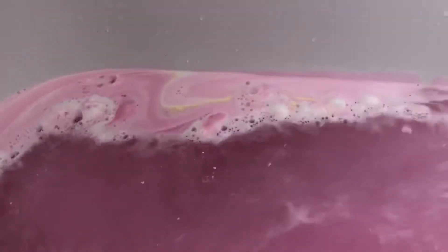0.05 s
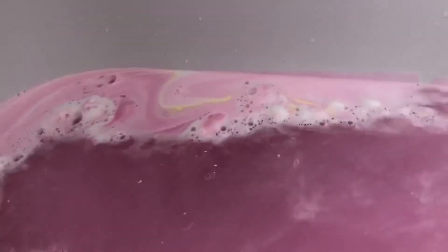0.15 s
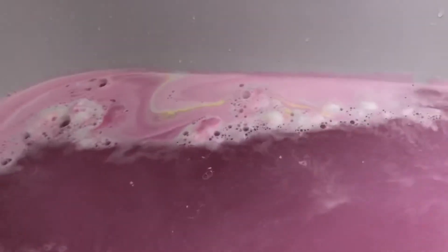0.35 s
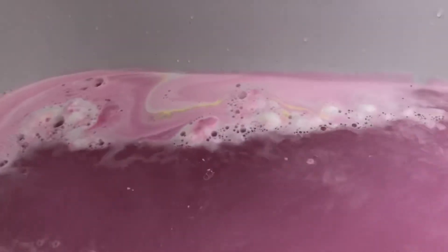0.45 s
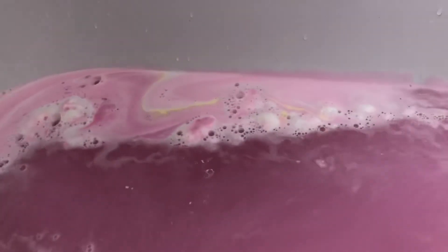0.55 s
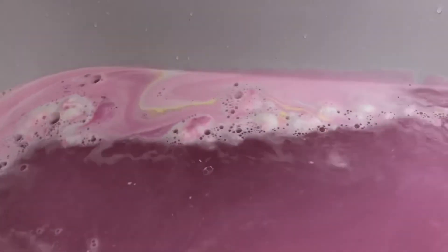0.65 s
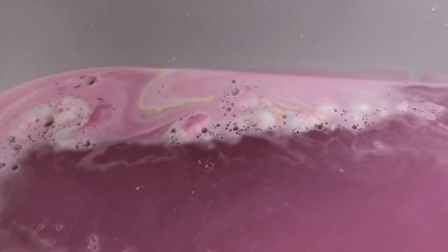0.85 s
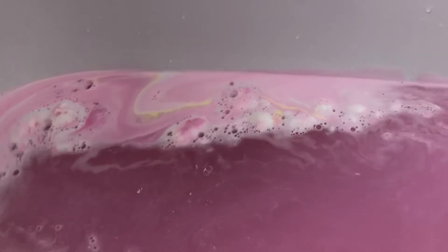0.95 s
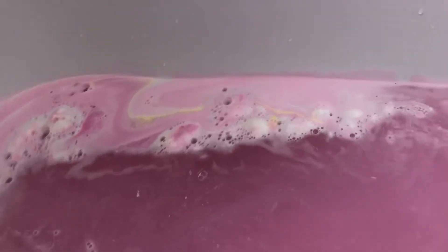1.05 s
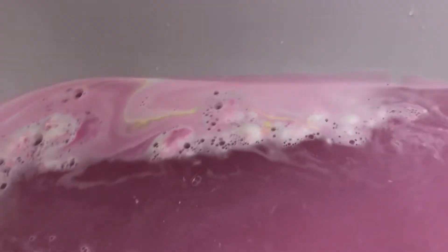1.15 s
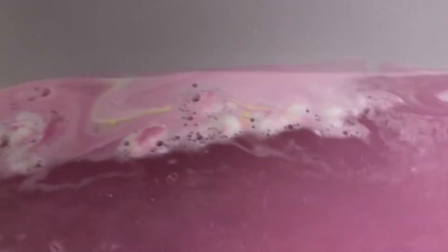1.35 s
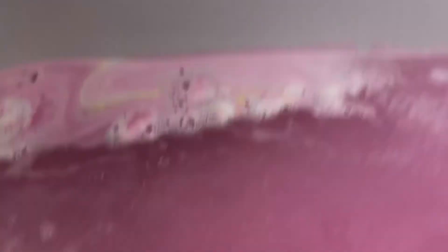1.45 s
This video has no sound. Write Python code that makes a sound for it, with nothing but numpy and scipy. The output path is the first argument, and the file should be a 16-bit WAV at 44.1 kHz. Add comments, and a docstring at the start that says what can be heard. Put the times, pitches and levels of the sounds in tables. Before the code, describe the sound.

Water sloshes gently in a bathtub, close to the microphone. Three brief plopping splashes come about half a second apart, with bubbles popping in between and soft low booms from the tub, over faint bathroom hum and hiss.

```python
"""Bath water laps in a tub: three small waves fold over with a splash and a plop, and drops and foam
tick between them. Each trapped bubble is a damped oscillator that rings briefly, rising in pitch.
The moving water makes the tub boom softly; the air in its hollow resonates and the hard-walled
bathroom reverberates. Low ventilation noise and a faint hiss lie underneath, and the gain dips
a little after each loud splash."""
import sys
import numpy as np
from scipy import signal
from scipy.fft import rfft, irfft
from scipy.io import wavfile
from scipy.ndimage import uniform_filter1d

SR = 44100
rng = np.random.default_rng(int(sys.argv[2]) if len(sys.argv) > 2 else 0)


def dump_mix(stems):
    """Bounce the given channels to the path in sys.argv[1] as a 16-bit WAV at rate SR."""
    frames = np.atleast_2d(stems).T  # one column per channel
    limited = np.clip(frames, -1, 1)  # hard clip at full scale
    pcm = np.round(limited * 32767).astype(np.int16)
    wavfile.write(sys.argv[1], SR, pcm)


N = 66150

# Trapped air bubbles (time [s], pitch [Hz], level [dB], decay time [s], rise [octaves per decay time])
TRAPPED_BUBBLES = [ (.0250, 4840, -39.5, 0.001, .02), (.1315, 1746, -48.5, 0.0064, 0.0063),
                   (.1690, 1210, -43.5, 0.0018, .03), (.1755, 2800, -40, 0.0016, 0.025),
                   (.1865, 1770, -43, 0.0038, 0.019), (.2065, 1163, -29, 0.0035, 0.1),
                   (.2238, 834, -31, 0.0041, 0.053), (.2330, 7800, -42, 0.0012, 0.05),
                   (.2402, 1460, -12, 0.00061, 0.01), (.2411, 874, -23, .0018, 0.017),
                   (.2415, 605.6, -22.5, 0.0099, 0.01), (.2412, 10600, -22.5, .0007, 0.03),
                   (.2525, 2400, -33, 0.0037, .01), (.3265, 11700, -41, 0.0015, 0.027),
                   (.3310, 3530, -45.5, 0.0018, .02), (.4225, 1973, -47.5, 0.0022, 0.029),
                   (.4370, 1300, -42, 0.0029, 0.046), (.4977, 4130, -34, 0.0011, 0.015),
                   (.4978, 2770, -38.5, 0.002, 0.013), (.4982, 1174, -39, 0.0079, 0.11),
                   (.5235, 1780, -45.5, 0.0033, 0.032), (.6725, 1670, -44.5, 0.0024, 0.028),
                   (.6962, 587, -28, 0.0037, 0.01138), (.6977, 4450, -23.5, 0.00059, 0.016),
                   (.7022, 933, -28, 0.0077, 0.031), (.7010, 1376, -30, 0.0039, 0.023),
                   (.7145, 1250, -32.5, 0.003, .03), (.7195, 2520, -34.5, 0.0032, 0.053),
                   (.8852, 3700, -38.5, 0.0011, 0.027), (.8856, 878, -38, 0.0045, 0.038),
                   (.8860, 1610, -47, 0.0014, .03), (.8850, 517, -50, 0.014, 0.0088),
                   (.9211, 1296, -42.5, 0.0037, .03), (.9217, 597, -43, 0.01, 0.024),
                   (.9860, 1136, -48, .008, 0.098), (.9868, 11000, -40.5, 0.00059, .02),
                   (1.0080, 1974, -35.5, 0.0064, 0.021), (1.0075, 1502, -37, 0.005, 0.023),
                   (1.0330, 8340, -39, 0.0012, 0.053), (1.0410, 3510, -31, 0.0016, 0.016),
                   (1.0562, 2970, -35, 0.0024, 0.016), (1.1125, 1830, -43.5, 0.0024, 0.017),
                   (1.1285, 8400, -40.5, .0015, 0.0313), (1.1555, 4230, -38.5, 0.0032, 0.048),
                   (1.1920, 1384, -20, 0.0024, 0.076), (1.1927, 1920, -28.5, 0.0014, .02),
                   (1.2015, 1295, -28, 0.0062, 0.0077), (1.2082, 2050, -29, 0.0042, 0.0061),
                   (1.2175, 1312, -37.5, 0.023, 0.0036)]
PINCH_CYCLES, PLOP_LOW_HZ = 0.36, 374
# Wet slaps and bursting films (time [s], level [dB], centre [Hz], width [octaves], decay time [s])
SLAPS = [ (0.0249, -44.5, 4600, 0.64, 0.0037), (0.1165, -31, 3600, 0.85, 0.0041),
         (.1300, -41.5, 4900, 1.4, 0.009), (0.168, -32, 4970, 3.4, 0.0026),
         (0.2055, -24, 4420, 1.4, 0.00063), (0.2228, -28.5, 2470, 0.91, 0.003),
         (0.2352, -30.5, 2800, 1.3, 0.0057), (0.2398, -16.5, 4100, 0.88, 0.0018),
         (0.299, -36.5, 6960, 0.83, 0.0027), (.4368, -48.5, 5660, 0.55, 0.0027),
         (0.4974, -30, 7460, 1.1, 0.00087), (0.5227, -42, 2830, 0.44, 0.0012),
         (0.6464, -49, 2260, 1.03, 0.011), (.6730, -42.5, 3000, .7, 0.0043),
         (0.6942, -35.5, 1510, 0.53, 0.011), (0.6973, -38, 13000, 1.2, 0.0013),
         (0.6983, -31, 4449, 0.25, 0.0035), (0.702, -41.5, 8600, 0.16, 0.0026),
         (0.7024, -32, 2040, 0.41, 0.0028), (.7080, -41, 530, 0.25, 0.021),
         (0.7243, -31.5, 3400, 1.01, 0.007), (0.8401, -41.5, 2530, 0.73, 0.0032),
         (0.87, -41, 4500, .8, 0.0013), (0.8855, -37, 3126, 0.22, 0.0022),
         (0.9435, -43, 4700, 0.52, 0.00089), (0.9848, -42.5, 2400, 1.2, 0.0022),
         (1.009, -42.5, 4100, .4, .003), (1.0411, -31, 4900, .6, 0.0021), (1.0515, -36, 5500, 1.2, 0.0026),
         (1.058, -39, 6500, 1.2, .002), (1.089, -46, 6500, 0.92, 0.0028),
         (1.1118, -37.5, 2930, 0.95, 0.0031), (1.121, -45, 5500, 0.35, 0.0045),
         (1.1546, -32.5, 5760, 1.9, 0.0016), (1.1918, -26, 2150, 0.82, 0.0016),
         (1.192, -40, 11000, 1.1, 0.0023), (1.1960, -40, 670, 0.72, 0.042),
         (1.2487, -41.5, 9600, 0.96, 0.0035), (1.3315, -44, 12500, 0.53, 0.0016),
         (1.433, -48.5, 6792, 0.44, 0.0018), (1.4915, -39, 3970, 0.87, 0.0014)]
SLAP_RISE_S = 0.00014
# Clouds of small bubbles (time [s], level [dB], decay time [s], centre [Hz], width [octaves])
BUBBLE_CLOUDS = [(.160, -43.5, 0.018, 2700, .5), (0.247, -48, 0.041, 7000, 0.71),
                 (0.714, -41.5, 0.026, 3350, 1.2), (.780, -60, .09, 1750, 0.6405),
                 (0.891, -61, 0.13, 1640, 1.6), (1.040, -55, 0.15, 5230, 0.67),
                 (1.198, -54.5, 0.016, 3400, 0.62)]
CLOUD_RISE_S, FIZZ_LOW_HZ, FIZZ_HIGH_HZ = 0.005, 799, 14830
FIZZ_PER_S, FIZZ_SPREAD_DB, FIZZ_DECAY_CYCLES = 2800, 3, 2.7
# Low booms of the moving water on the tub (time [s], pitch [Hz], level [dB], decay time [s])
TUB_BOOMS = [(0.059, 61.6, -55.5, 0.16), (.255, 123.3, -43, 0.038), (0.256, 233, -45.5, 0.045),
             (0.701, 127, -47, 0.029), (.700, 237, -52, 0.06625), (.950, 65, -55, 0.065),
             (1.059, 111, -47.5, 0.14), (1.192, 72, -38, 0.02), (1.194, 236, -48, 0.034),
             (1.196, 372.5, -43.5, 0.017), (1.445, 64.5, -41.5, 0.068)]
BOOM_RISE_S = 0.01
# Air modes of the tub (frequency [Hz], gain [dB], time to fall 60 dB [s])
TUB_MODES = [(471, 3, 0.24), (533, -10, 0.51), (602.67, -4.5, 0.45), (816, 7, 0.39), (1201, 0.5, 0.096),
             (1355, -10, 0.16), (1625, 4.5, 0.12), (2112.8, 8, 0.13), (2415, -1.5, 0.21)]
# Reflections from the tub walls (delay [s], gain [dB])
TUB_ECHOES = [(.0017, -16.5), (.0046, -19.5), (0.0107, -22.5), (0.0131, -18.5)]
# Reverberation time of the bathroom (frequency [Hz], time to fall 60 dB [s])
REVERB_TIMES = [(150, 0.15), (400, 0.53), (1040, 0.2831), (2760, 0.35), (7280, 0.17), (15000, 0.1)]
# Colour of the reverberation (frequency [Hz], gain [dB])
REVERB_COLOUR = [(150, 16), (500, -0.5), (1200, -0.5), (2500, -1.5), (5000, -4.5), (10000, -6.5),
                 (16000, 1)]
REVERB_DB, REVERB_BUILD_S = -2.5, 0.0071
# Spectrum of the ventilation rumble (frequency [Hz], relative density [dB])
RUMBLE_SPECTRUM = [(20, -71), (40, -20), (58, -11), (88, -7.5), (112, -2), (145, -7), (175, 2), (203, -1),
                   (216, -21.5), (300, -19.5), (450, -25), (900, -22.5), (2000, -45), (4000, -83)]
RUMBLE_DB, HUM_DB, HUM_HZ, HUM_WAVER_HZ = -57, -60, 200.4, 2.92
# Spectrum of the hiss (frequency [Hz], relative density [dB])
HISS_SPECTRUM = [(100, -16), (1000, -8), (2200, 0.5), (4500, 5), (8000, 4), (15000, 4), (16500, 3)]
HISS_DB = -65.5
LOW_CUT_HZ, HIGH_CUT_HZ = 48, 16000
DUCK_ABOVE_DB, DUCK_SHARE, RELEASE_DB_PER_S = -35, 0.17, 18


def bubble(hz, decay, rise):
    """Damped oscillation: air is the spring, water the mass; the pitch climbs as it nears the surface."""
    t = np.arange(0, 7 * decay, 1 / SR)
    cycles = np.cumsum(hz * 2 ** (rise * t / decay)) / SR
    pinch_off = 1 - np.exp(-cycles / PINCH_CYCLES)
    return pinch_off * np.exp(-t / decay) * np.sin(2 * np.pi * cycles)


def plops():
    """Bubble resonance: single bubbles ring out and, being small sources, radiate almost no bass."""
    out = np.zeros(N)
    for start, hz, db, decay, rise in TRAPPED_BUBBLES:
        add(out, start, amp(db) * bubble(hz, decay, rise))
    return highpass(out, PLOP_LOW_HZ)


def slaps():
    """Impulsive excitation: water strikes water or a film bursts, giving a brief band of noise."""
    out, t = np.zeros(N), np.arange(6000) / SR
    for start, db, hz, octaves, decay in SLAPS:
        envelope = (1 - np.exp(-t / SLAP_RISE_S)) * np.exp(-t / decay)
        burst = bandpass(envelope * rng.standard_normal(len(t)), hz, octaves)
        burst *= np.linalg.norm(envelope) / np.linalg.norm(burst)
        add(out, start, 0.5 * amp(db) * burst)
    return out


def fizz(sizes=36):
    """Incoherent superposition: tiny bubbles stirred up by each wave ring at random times."""
    out, t = np.zeros(N), np.arange(N) / SR
    pitches = np.geomspace(FIZZ_LOW_HZ, FIZZ_HIGH_HZ, sizes)
    envelopes = np.zeros((sizes, N))
    for start, db, decay, centre, octaves in BUBBLE_CLOUDS:
        age = np.maximum(t - start, 0)
        flare = amp(db) * (1 - np.exp(-age / CLOUD_RISE_S)) * np.exp(-age / decay)
        share = np.exp(-0.5 * (np.log2(pitches / centre) / octaves) ** 2)
        envelopes += np.outer(share / np.linalg.norm(share), flare)
    for hz, envelope in zip(pitches, envelopes):
        strength = amp(FIZZ_SPREAD_DB * np.minimum(rng.exponential(1, N), 3))
        births = rng.random(N) < FIZZ_PER_S / sizes / SR
        ring = bubble(hz, decay=FIZZ_DECAY_CYCLES / hz, rise=0.024)
        out += signal.oaconvolve(envelope * unit(strength * births), ring / np.linalg.norm(ring))[:N]
    return out


def booms():
    """Damped vibration: the moving mass of water sets the tub ringing at low frequencies."""
    out, t = np.zeros(N), np.arange(N) / SR
    for start, hz, db, decay in TUB_BOOMS:
        envelope = (1 - np.exp(-(t / BOOM_RISE_S) ** 2)) * np.exp(-t / decay)
        add(out, start, amp(db) * envelope * np.sin(2 * np.pi * hz * t))
    return out


def tub(water):
    """Reflection and cavity resonance: wall echoes and air modes add to the direct sound."""
    out = water.copy()
    for delay, db in TUB_ECHOES:
        add(out, delay, amp(db) * water)
    for hz, db, t60 in TUB_MODES:
        radius = amp(-60 / (t60 * SR))
        pole = radius * np.exp(2j * np.pi * hz / SR)
        out += amp(db) * 2 * signal.lfilter([1 - radius], [1, -pole], water).real
    return out


def bathroom(water):
    """Diffuse reverberation: hard walls return a dense tail that lasts longest in the low midrange."""
    wash = rng.standard_normal(SR)
    for _ in range(4):  # flatten the spectrum so that no pitch booms or drops out
        spectra = signal.stft(wash, SR, nperseg=2048)[2]
        wash = signal.istft(spectra / (abs(spectra) + 1e-12), SR)[1][:SR]
    hz, t, spectra = signal.stft(wash, SR, nperseg=256)
    envelope = amp(-60 * t / curve(REVERB_TIMES, hz)[:, None])
    envelope *= 1 - np.exp(-(t / REVERB_BUILD_S) ** 2)
    spectra = spectra * envelope / np.linalg.norm(envelope, axis=1, keepdims=True)
    white_tail = signal.istft(spectra, SR)[1]
    colour = amp(curve(REVERB_COLOUR, hz))[:, None]
    tail = signal.istft(spectra * colour, SR)[1] / np.linalg.norm(white_tail)
    return amp(REVERB_DB) * signal.fftconvolve(water, tail)[:N]


def background():
    """Stationary noise: ventilation rumble, its hum under random frequency modulation, and faint hiss."""
    drift = uniform_filter1d(rng.standard_normal(N), size=3000)
    waver = unit(uniform_filter1d(drift, size=3000))
    hum = unit(np.sin(2 * np.pi * np.cumsum(HUM_HZ + HUM_WAVER_HZ * waver) / SR))
    ventilation = amp(RUMBLE_DB) * noise(RUMBLE_SPECTRUM) + amp(HUM_DB) * hum
    return ventilation + amp(HISS_DB) * noise(HISS_SPECTRUM)


def noise(spectrum):
    """Spectral shaping: white noise takes on the given spectrum, at unit rms."""
    gain = amp(curve(spectrum, np.fft.rfftfreq(N, 1 / SR)))
    return unit(irfft(rfft(rng.standard_normal(N)) * gain, N))


def bandpass(x, hz, octaves):
    """Minimum-phase filtering: a causal response, bell-shaped on a log-frequency axis."""
    frequencies = abs(np.fft.fftfreq(1024, 1 / SR)) + 1
    log_gain = np.maximum(-0.5 * (np.log2(frequencies / hz) / octaves) ** 2, -7)
    response = np.exp(signal.hilbert(log_gain).conj())
    taps = np.fft.ifft(response).real[:512]
    return signal.fftconvolve(x, taps / np.linalg.norm(taps))


def highpass(x, hz):
    """Fourth-order filtering: the bass falls 24 dB per octave below the cutoff."""
    return signal.sosfilt(signal.butter(4, hz, "hp", fs=SR, output="sos"), x)


def amp(db):
    """The decibel scale: level to amplitude ratio."""
    return 10 ** (np.asarray(db) / 20)


def unit(x):
    """Normalisation to an rms of one."""
    return x / np.sqrt(np.mean(x ** 2) + 1e-20)


def curve(points, hz):
    """Interpolation of a table on a log-frequency axis."""
    frequencies, values = np.transpose(points)
    return np.interp(np.log(hz + 1), np.log(frequencies + 1), values)


def add(mix, start, sound):
    """Superposition: a sound joins the mix at its start time in seconds."""
    part = mix[round(start * SR):][:len(sound)]
    part += sound[:len(part)]


def scene():
    """Source and filter: the water excites tub and room, and the booms and background add to them."""
    water = plops() + slaps() + fizz()
    return (tub(water) + bathroom(water) + booms() + background())[None]


def record(dry):
    """Compression between two band limits: the gain dips after loud splashes and recovers slowly."""
    sound = highpass(dry[0], LOW_CUT_HZ)
    power_db = 10 * np.log10(abs(uniform_filter1d(sound ** 2, size=300)) + 1e-12)
    release_db = RELEASE_DB_PER_S * np.arange(N) / SR
    held_db = np.maximum.accumulate(power_db + release_db) - release_db  # each peak sinks steadily
    excess_db = np.maximum(held_db - DUCK_ABOVE_DB, 0)
    lagged_db = signal.lfilter([0.002], [1, -0.998], excess_db)  # time constant of 11 ms
    ducked = sound * amp(-DUCK_SHARE * lagged_db)
    lowpass = signal.firwin(511, HIGH_CUT_HZ, window=("kaiser", 9), fs=SR)
    return signal.oaconvolve(ducked, lowpass, "same")[None]


dry = scene()
out = record(dry)
dump_mix(out)
```